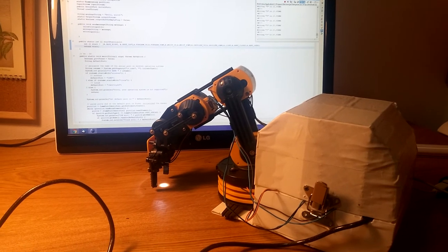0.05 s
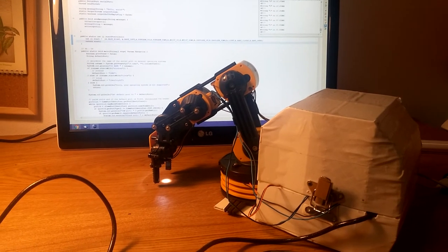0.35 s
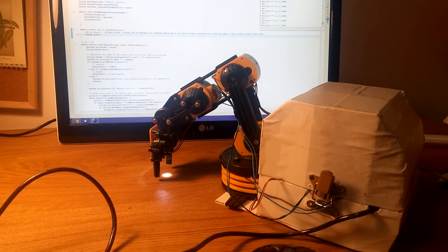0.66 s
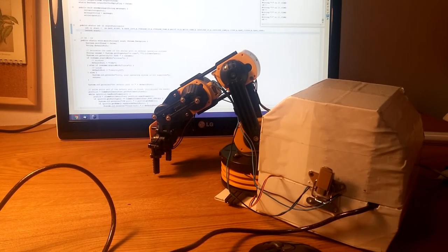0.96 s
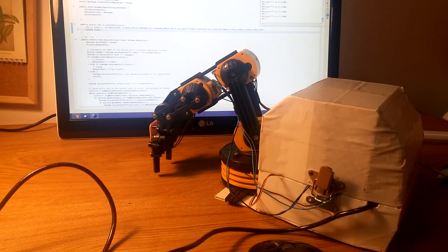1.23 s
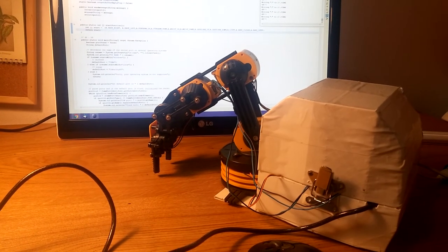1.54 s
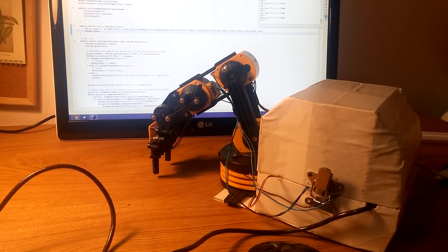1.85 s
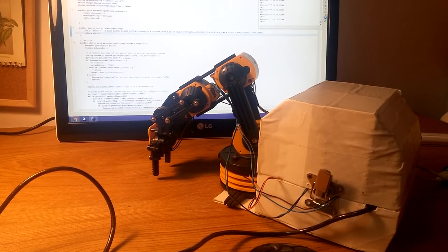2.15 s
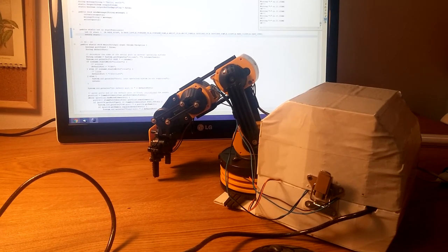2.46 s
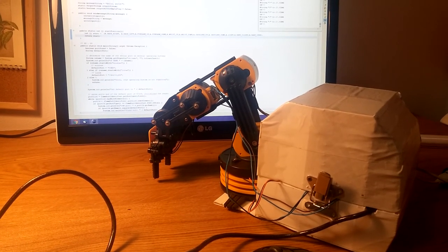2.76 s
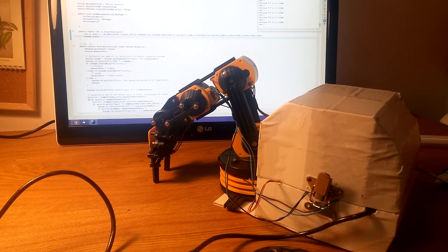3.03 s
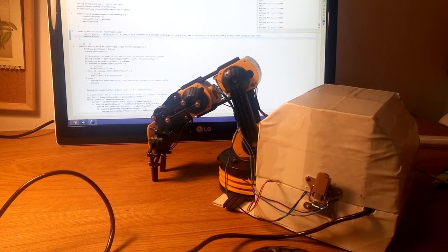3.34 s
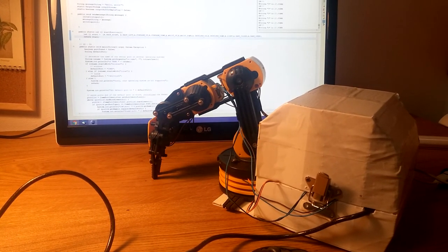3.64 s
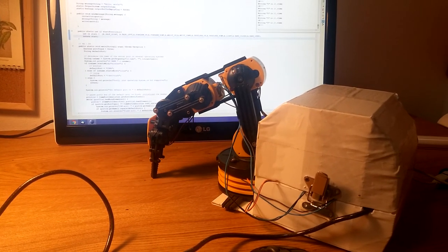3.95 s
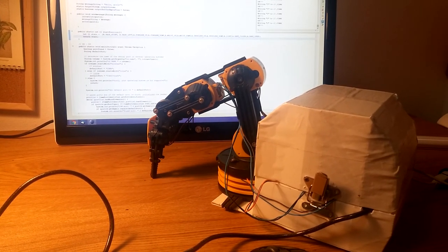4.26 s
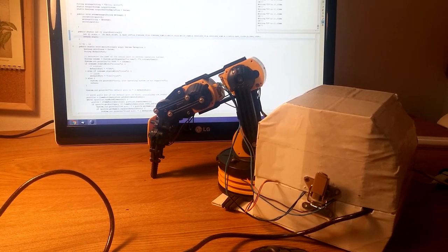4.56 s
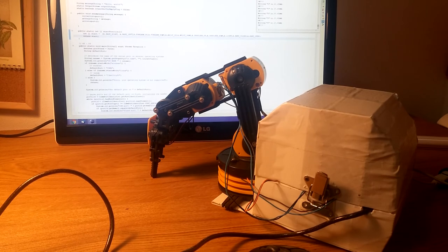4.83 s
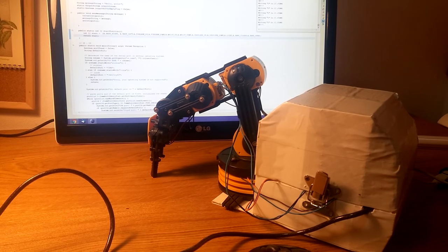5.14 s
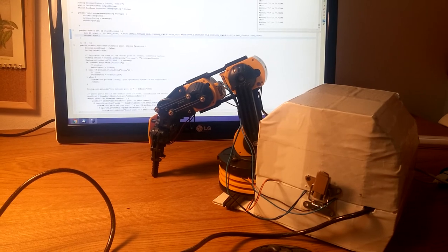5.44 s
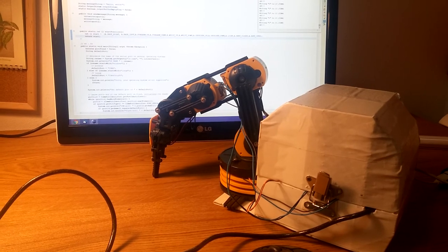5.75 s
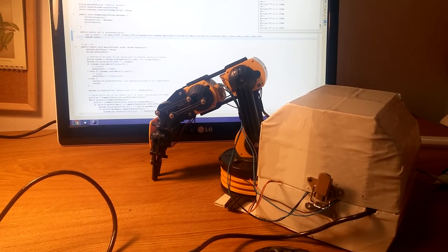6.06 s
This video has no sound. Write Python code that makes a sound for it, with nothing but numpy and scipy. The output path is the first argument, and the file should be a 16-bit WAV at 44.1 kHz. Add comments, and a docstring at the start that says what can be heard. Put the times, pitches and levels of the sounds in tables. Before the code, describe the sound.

For almost three seconds there is only quiet room noise with a faint, thin electronic whine. At about 2.9 seconds a small toy robot arm starts nearby with a brief high squeak, and its motor quickly spins up to a steady hum with a bright gear whir. A couple of light clicks come just after 3 seconds. From about 3.2 seconds the hum weakens as the plastic gears whine, chatter and judder under load. Around 4 seconds the joint hits its limit with a short bright rasp, a few knocks and a low thud, and the gears coast to rest by about 4.5 seconds. The quiet room returns. At about 5.9 seconds the motor starts again with small clicks, humming and whirring briefly until the end.

```python
"""A toy robot arm whirs on a desk, driven by a small brush motor through a plastic gearbox.
The shaft squeaks as it breaks free, the spinning rotor hums, and the gear teeth whine and chatter.
At the end of its travel the joint rasps and stops with a knock, and the gears coast to rest.
Then the motor starts again. Quiet room noise and a faint electronic whine lie underneath."""
import sys
import numpy as np
from scipy import signal
from scipy.fft import rfft, irfft
from scipy.io import wavfile
from scipy.ndimage import uniform_filter1d

SR = 44100
rng = np.random.default_rng(int(sys.argv[2]) if len(sys.argv) > 2 else 0)


def wav_out(sig):
    """Save sig, one row per channel (or a flat mono array), as 16-bit PCM at SR to the path in sys.argv[1]."""
    wavfile.write(sys.argv[1], SR, np.round(np.clip(np.atleast_2d(sig).T, -1, 1) * 32767).astype(np.int16))


N = 273420
TIME, FREQS = np.arange(N) / SR, np.maximum(np.arange(N // 2 + 1) * SR / N, 1)


def from_db(db):
    """Turn decibels into a gain."""
    return 10 ** (np.asarray(db) / 20)


def at_hz(points, hz):
    """Read between the rows of a table, on a log-frequency axis."""
    frequencies, values = np.transpose(points)
    return np.interp(np.log(hz), np.log(frequencies), values)


def envelope(start, length, attack_s, t60):
    """Rise, hold until the length is over, then fade by 60 dB every t60 seconds."""
    age = TIME - start
    return np.clip(age / attack_s, 0, 1) * from_db(-60 * np.clip((age - length) / t60, 0, 4))


def drift(rate):
    """A smooth random wobble, about 1 in size, that changes about rate times a second."""
    step = 40  # samples between points
    pole = np.exp(-2 * np.pi * rate * step / SR)
    slow = signal.lfilter([1], [1, -2 * pole, pole ** 2], rng.standard_normal(N // step + 2002))[2000:]
    return np.interp(np.arange(N) / step, np.arange(len(slow)), slow / np.sqrt(np.mean(slow ** 2)))


def resonances(modes, hz=FREQS):
    """Gain at each frequency for a part that rings at certain pitches."""
    return sum(from_db(db) / (1 + ((hz - centre) / width) ** 2) for centre, width, db in modes)


def radiation(hz=FREQS, corner_hz=82):
    """The small arm hardly moves any air in the deep bass."""
    return 1 / np.sqrt(1 + (corner_hz / hz) ** 10)


def impacts(cycles, spread_db, ring_s, bed):
    """Loudness shape of one hit per cycle, each of random force, over a bed of steady friction."""
    force = from_db(spread_db * np.clip(rng.standard_normal(N), -2, 2))
    hits = np.diff(np.floor(cycles), prepend=0) * force ** 2
    energy = signal.lfilter([1], [1, -np.exp(-2 / (ring_s * SR))], hits + 1e-18)
    average = uniform_filter1d(energy, size=4410) + 1e-9
    return np.sqrt((energy / average + bed) / (1 + bed))


# How the arm's sound leans to one side. Each row: frequency in Hz, left minus right in dB.
ARM_BALANCE = [(300, 0), (900, 0), (1400, -5), (2800, 1), (4000, -6.5), (4900, -0.5), (6000, -6.5),
               (8000, -11), (9500, -18.5), (11000, -27.5), (13000, -9), (15000, -10.5)]


def microphones(hz):
    """Left and right gain for the arm; the left microphone is shaded from its treble."""
    left = from_db(at_hz(ARM_BALANCE, hz))
    return np.array([left, np.ones_like(left)]) / np.sqrt((1 + left ** 2) / 2)


# How alike the arm sounds left and right. Each row: frequency in Hz, likeness (1 same, -1 opposite).
ARM_LIKENESS = [(130, 1), (290, 0.96), (640, 0.75), (1410, 0.24), (3100, -0.091), (7000, -0.18),
                (15000, -0.88)]


def noise(gain, likeness=ARM_LIKENESS, hz=FREQS, from_arm=True):
    """Stereo noise shaped by a gain at each frequency; the average of its two sides has power 1."""
    alike = np.clip(at_hz(likeness, hz), -.999, .999)
    mid, side = rfft(rng.standard_normal((2, 2 * len(hz) - 2)))
    pair = np.sqrt(1 + alike) * mid + np.sqrt(1 - alike) * side * [[1], [-1]]
    out = irfft(pair * gain * (microphones(hz) if from_arm else 1))
    return out / np.std(out.mean(axis=0))


# The tone of the room noise. Each row: frequency in Hz, relative level in dB.
ROOM_SPECTRUM = [(15, -8), (38, -22), (65, -12), (88, -1), (120, -8), (200, -3), (250, -2.5), (330, -4.5),
                 (1000, -7), (2000, -9), (5000, -14), (8500, -22), (13000, -29), (15500, -27.5)]
# How alike the room noise is left and right. Each row: frequency in Hz, likeness (1 same, 0 unrelated).
ROOM_LIKENESS = [(60, 0.76), (180, 0.22), (550, 0.091), (1650, 0.057), (4970, 0.02), (15000, 0.03)]
# Steady tones of the electronics. Each row: pitch in Hz, level in dB, pitch wander in Hz.
ELECTRONIC_TONES = [(51.7, -83, .15), (88.4, -84, 0.52), (93, -88, .3), (254, -87.5, 0.68),
                    (2386, -81, 5.9), (4775, -93.5, 7.4), (8100, -98, 1)]


def background():
    """Even room noise with the hum and thin whine of the desk electronics."""
    out = from_db(-69) * noise(from_db(at_hz(ROOM_SPECTRUM, FREQS)), ROOM_LIKENESS, from_arm=False)
    for hz, db, wander_hz in ELECTRONIC_TONES:
        cycles = np.cumsum(hz + wander_hz * drift(15)) / SR
        out += from_db(db) * np.sqrt(2) * np.sin(2 * np.pi * cycles)
    return out


def room_echo(sound, t60, wet_db, size=16384):
    """Desk and walls add a short wash of echoes, different at each microphone."""
    age = np.arange(size) / SR
    tail = rng.standard_normal((2, size)) * from_db(-60 * age / t60) * (age > .004)
    band = signal.butter(2, [450, 7000], "band", fs=SR, output="sos")
    tail = signal.sosfilt(band, tail / np.sqrt(np.sum(tail[0] ** 2)))
    return sound + from_db(wet_db) * signal.fftconvolve(sound, tail, axes=1)[:, :N]


# The tones in the squeak. Each row: pitch in Hz, pitch wander in Hz, relative level in dB.
SQUEAK_TONES = [(3780, 82, 1.5), (3990, 129, 0.5), (7460, 132, -1), (11020, 190, 2)]


def shaft_squeak(start=2.8598):
    """The shaft sticks and slips as it breaks free: rough tones, of which the upper ones die first."""
    age, out = np.clip(TIME - start, 0, .1), 0
    for hz, wander_hz, db in SQUEAK_TONES:
        cycles = np.cumsum(hz + wander_hz * drift(300)) / SR + rng.random((2, 1)) / 4
        tone = microphones(hz)[:, None] * np.sin(2 * np.pi * cycles)
        hiss = 0.5 * noise(resonances([(hz, 220, 0)]))
        fade_db = -85 * age * (hz / SQUEAK_TONES[0][0] - 1)
        out += from_db(db + fade_db + 2 * drift(150)) * (tone + hiss)
    level_db = -50 + 11.5 * np.exp(-age / .01)  # loudest as it breaks free
    return from_db(level_db) * envelope(start, length=.036, attack_s=.002, t60=.19) * out


STRAIN_AT_S, STRAIN_S, STRAIN_ATTACK_S = 3.935, 0.11, .026  # the joint pushes against its end stop
# The tone of the scraping teeth. Each row: frequency in Hz, relative level in dB.
RASP_SPECTRUM = [(1700, -37), (2500, -9.5), (3100, -7), (4000, -4), (5800, -2), (7400, -5.5), (8100, -13),
                 (9400, -4), (10700, -3), (12000, -15), (13500, -21), (15700, -21)]


def end_stop_rasp():
    """Strained teeth scrape over each other, about 880 a second, in a short bright rasp."""
    teeth = np.cumsum(880 * from_db(1.5 * drift(40))) / SR
    scrape = noise(from_db(at_hz(RASP_SPECTRUM, FREQS)))
    scrape *= impacts(teeth, spread_db=3, ring_s=.0015, bed=.6)
    return from_db(-31.5) * envelope(STRAIN_AT_S, STRAIN_S, STRAIN_ATTACK_S, t60=0.32) * scrape


def frame_thud(start=4.062, db=-26.5, hz=128, attack_s=0.0115, t60=.3):
    """The halting arm shakes the frame, whose main note builds up over a few cycles and dies."""
    age = np.maximum(TIME - start, 0)
    return from_db(db - 60 * age / t60) * (1 - np.exp(-age / attack_s)) * np.sin(2 * np.pi * hz * age)


# Plastic parts knock as they take up their slack. Each row: start in seconds, relative level in dB,
# centre in Hz, width in octaves, seconds to fade by 60 dB.
KNOCKS = [(0.417, -66, 10000, .3, 0.014), (2.863, -52.5, 228, 0.38, 0.59), (3.086, -39, 1400, 0.35, 0.044),
          (3.171, -34, 6530, 1.2, 0.04), (3.171, -34, 11040, 0.023, 0.12), (3.815, -34.5, 304, 0.3, 0.17),
          (3.925, -37.5, 280, 0.35, 0.16), (4.053, -30, 10500, .4, 0.15), (4.058, -34, 600, 2.5, 0.18),
          (4.069, -40, 1090, 1.4, 0.1364), (4.088, -36.5, 300, 0.92, 0.16), (4.19, -57, 1890, 0.084, 0.55),
          (5.859, -55, 9300, 0.27, .04), (5.887, -45.5, 3500, 2.4, 0.042), (5.931, -47, 440, 0.079, 0.68),
          (6.002, -40.5, 2150, 0.13, 0.033)]


def knocks(size=16384):
    """Each knock rings one band of the frame, the gearbox shell and the gears."""
    out, age = np.zeros((2, N + size)), np.arange(size) / SR
    hz = np.maximum(np.arange(size // 2 + 1) * SR / size, 1)
    frame = from_db(9.5) * resonances(FRAME_MODES, hz)
    body = radiation(hz) * (frame + resonances(SHELL_MODES, hz) + from_db(at_hz(WHIRR_SPECTRUM, hz)))
    for start, db, centre_hz, octaves, t60 in KNOCKS:
        band = np.exp(-.5 * (np.log2(hz / centre_hz) / octaves) ** 2)
        rise = 1 - np.exp(-2 * age * centre_hz)
        at = round(start * SR)
        out[:, at:at + size] += from_db(db - 60 * age / t60) * rise * noise(body * band, hz=hz)
    # soft plastic contacts leave out the highest treble
    return signal.sosfilt(signal.butter(10, 11600, fs=SR, output="sos"), out[:, :N] + 1e-18)


# Low ringing of arm and desk. Each row: pitch in Hz, width in Hz, relative level in dB.
FRAME_MODES = [(82.3, 7, -4.5), (98.7, 12, -7), (128.3, 4.9, 10.5), (181, 30, -20.5), (256.6, 26, 0)]
# The arm judders. Each row: start in seconds, length in seconds, relative level in dB.
JUDDERS = [(2.873, 0.055, -58), (3.35, 0.064, -50.5), (3.445, 0.15, -48), (3.64, .11, -48),
           (3.82, 0.12, -48.5), (4.045, 0.13, -47), (5.875, 0.12, -53.5), (6.04, .05, -54),
           (6.14, 0.023, -47)]


def frame_rumble(level_db):
    """The gears shake the frame, and the arm judders as it starts and under load."""
    judder = sum(from_db(db) * envelope(start, length, attack_s=.015, t60=0.1505)
                 for start, length, db in JUDDERS)
    return np.hypot(from_db(level_db), judder) * from_db(-1.5) * noise(resonances(FRAME_MODES) * radiation())


def rotor_hum(turns, speed, load):
    """The unbalanced rotor shakes the arm once a turn, most at the pitches where the arm rings."""
    widen = 1 + 5 * load ** 2  # the arm's weight damps and widens its resonances
    modes = [(257.3, 8.1 * widen, 2.2), (291.2, 2.3 * widen, 0.87)]  # pitch in Hz, width in Hz, dB
    shake = resonances(modes, speed) + from_db(-33.5)  # a little gets through at any speed
    keep = np.exp(-1 / (0.023 * SR))  # the ringing takes 23 ms to build up
    shake = signal.lfilter([1 - keep], [1, -keep], shake)
    loose = 0.32 * load ** 3  # loose joints blur this share of the tone into noise
    blur = noise(resonances([(283.4, 48.5, 0)]))
    return shake * (np.sqrt(1 - loose) * np.sin(2 * np.pi * turns) + np.sqrt(loose) * blur)


# Jolts that throw the gear teeth about. Each row: start in seconds, length in seconds.
JOLTS = [(2.862, 0.078), (3.086, 0.11), (5.856, 0.15)]


def rattle_share(load):
    """How much the teeth rattle, from 0 to 1: a little always, more under load and after a jolt."""
    jolted = sum(envelope(start, length, attack_s=0.0039, t60=0.19) for start, length in JOLTS)
    return np.clip(0.044 + load ** 3 + jolted, 0, 1)


# Ringing of the gearbox shell. Each row: pitch in Hz, width in Hz, relative level in dB.
SHELL_MODES = [(330, 61, -7), (437, 49, 6), (620, 80, -1), (778, 40, -2.5), (830, 67, -0.5), (941, 11, 8),
               (1058, 28, 8), (1217, 54, 1.5), (1482, 76, -4), (1700, 250, 1.5), (1910, 49, 2.5),
               (2140, 70, -3.5), (2330, 45, -2), (2634, 70, -4)]


def gear_chatter(turns, rattle):
    """Rattling teeth ring the shell with one uneven hit every two turns of the rotor."""
    shell = noise(resonances(SHELL_MODES))
    return np.sqrt(rattle) * shell * impacts(turns / 2, spread_db=7.5, ring_s=0.022, bed=1)


# The tone of the whirring gears. Each row: frequency in Hz, relative level in dB.
WHIRR_SPECTRUM = [(1400, -34.5), (2500, -2.5), (3400, -9), (4000, -5), (5200, 2), (6300, -4.5), (7300, -6),
                  (8100, -13), (9400, -1), (10700, 0), (12000, -8), (13000, -21.5), (15500, -21)]
# Ringing of the gear wheels. Each row: pitch in Hz, width in Hz, relative level in dB.
WHEEL_MODES = [(3176, 77, -6), (3960, 104, 1.5), (4750, 119.5, -5.5)]


def gear_whirr(turns):
    """Three light tooth hits per turn blend into a bright whirr that rings the wheels."""
    wheels = noise(from_db(at_hz(WHIRR_SPECTRUM, FREQS)) + resonances(WHEEL_MODES))
    return wheels * impacts(3 * turns, spread_db=1, ring_s=0.0018, bed=0.52)


# The rotor's overtones. Each row: multiple of the speed (rounded when played), relative level in dB
# with no load, relative level in dB at full load.
OVERTONES = [(2, -21, -19), (3, -17, -9.5), (4, -25, -26.5), (5, -17.5, -14.5), (6, -11, -20),
             (7, -11, -19.5), (8, -16, -20.5), (9.33, -23, -25), (10, -24.5, -21.5), (11, -19, -30.5),
             (12, -18, -26), (13, -22, -21), (14, -27, -17.5), (15, -24.5, -16.5), (17, -20, -15),
             (18, -24, -16), (18.95, -18.5, -19.5), (20, -16, -23), (21, -27, -16), (22, -34, -16.5),
             (23, -20, -19), (24, -25.5, -24.5), (25, -28, -16), (26, -36, -22.5), (30, -13, -21.5),
             (31, -32, -23.5), (32, -24, -16), (32.9, -8.5, -21.5), (34, -14, -24), (35, -25, -16),
             (36, -7, -14), (37, -33, -35), (38, -17, -29.5), (39, -5, -40), (40, -28, -45), (41, -23, -37)]
# The gears sing out on one overtone. Each row: start in seconds, length in seconds,
# multiple of the speed, boost in dB.
WHISTLES = [(3.08, 0.1, 20, 8.5), (3.3, .19, 19, 13), (3.349, 0.22, 14, 9), (3.456, 0.12, 20, 15.5),
            (3.56, 0.072, 19, 13), (3.647, 0.27, 18, 4.5), (3.83, .08, 17, 9), (6.044, 0.065, 14, 18),
            (6.066, 0.081, 19, 10), (6.1, .1, 18, 7), (6.092, 0.14, 17, 4.5)]


def rotor_whine(turns, speed, load, low_db, high_db):
    """The motor's brush contacts and small gear make overtones that swell and fade as the teeth shift."""
    started = TIME > RUNS[0][0]
    jitter = .0022 * (1 + load) * drift(25)
    out, phase = np.zeros((2, N)), 2 * np.pi * (turns + jitter)[started]
    top_speed = speed.max()
    too_slow_db = -np.maximum(.98 * top_speed - speed, 0) / 3  # high overtones need full speed
    # strained or coasting gears lose their even mesh until the next start
    mesh_db = np.clip(-120 * (TIME - STRAIN_AT_S), -30, 0) * (TIME < RUNS[1][0])
    for multiple, light_db, loaded_db in OVERTONES:
        hz = multiple * top_speed
        base_db = low_db if hz < SHELL_MODES[-1][0] else high_db + too_slow_db
        whistle_db = sum(db * envelope(start, length, attack_s=.03, t60=0.19)
                         for start, length, singing, db in WHISTLES if round(singing) == round(multiple))
        overtone_db = light_db + load * (loaded_db - light_db)
        swell = from_db(base_db + overtone_db + whistle_db + mesh_db + 3 * drift(13))[started]
        right_shift = np.arccos(np.clip(at_hz(ARM_LIKENESS, hz), -1, 1)) * rng.choice([-1, 1])
        offsets = rng.uniform(0, 2 * np.pi) + np.array([[0], [right_shift]])
        out[:, started] += microphones(hz)[:, None] * swell * np.sin(round(multiple) * phase + offsets)
    return out


# Full speed sags and recovers with the arm's leverage. Each row: time in seconds, turns per second.
FULL_SPEED = [(3.1, 291.6), (3.184, 291.0), (3.262, 297.0), (3.378, 288.0), (3.6, 288.2), (3.87, 294.7)]
# The motor's runs. Each row: power on, power off and start of lifting in seconds, load before lifting
# from 0 to 1, relative level in dB, extra hum in dB.
RUNS = [(2.862, 4.049, 3.195, 0.19, 0, 0.5), (5.856, 6.3, 6.06, 0.21, -0.5, -3)]


def motor_motion(kick_hz=128, spin_up_s=.255, brake_hz_per_s=713):
    """The rotor spins up from a kick and takes the arm's weight; with the power off, friction brakes it."""
    full_speed = np.interp(TIME, *np.transpose(FULL_SPEED))
    state = np.zeros((5, N))
    for on, off, lift, idle_load, db, extra_hum_db in RUNS:
        coast_s = np.maximum(TIME - off, 0)
        lag = np.clip(1 - (TIME - on) / spin_up_s, 0, 1) ** 2
        speed = np.maximum(full_speed + (kick_hz - full_speed) * lag - brake_hz_per_s * coast_s, 0)
        lifted = np.clip((TIME - lift) / 0.097, 0, 1)
        working_load = 0.81 + 0.32 * (TIME - lift)  # grows as the arm reaches out
        load = np.clip(idle_load + lifted * (working_load - idle_load), 0, 1)
        gain = from_db(db) * np.clip((TIME - on) / 0.026, 0, 1) * np.minimum(speed / 45, 1)
        state = np.where(TIME >= on, [speed, load, coast_s, gain, np.full(N, extra_hum_db)], state)
    return state


def motor_and_gearbox():
    """Hum, whine, chatter, whirr and rumble all follow the motor's speed and load."""
    speed, load, coast_s, gain, extra_hum_db = motor_motion()
    turns, rattle = np.cumsum(speed) / SR, rattle_share(load)
    decades = np.log10(np.maximum(speed, 1) / speed.max())  # -1 at a tenth of top speed

    def level(db, speed_db, load_db, fade_db):
        """Level at top speed, changed per tenfold speed, by full load and per second of coasting."""
        return db + speed_db * decades + load_db * load - fade_db * coast_s

    hum_db = level(-27.5, speed_db=1.5, load_db=-29, fade_db=7) + extra_hum_db
    chatter_db = level(-49.44, speed_db=30, load_db=4.5, fade_db=39)
    whirr_db = level(-47, speed_db=20.5, load_db=5, fade_db=47)
    # tight teeth give clean overtones, rattling ones give noise
    low_whine_db = level(-39.5, speed_db=30, load_db=4.5, fade_db=39) - 4.5 * rattle
    high_whine_db = level(-37, speed_db=20.5, load_db=4, fade_db=47)
    hum = from_db(hum_db) * rotor_hum(turns, speed, load)
    whine = rotor_whine(turns, speed, load, low_whine_db, high_whine_db)
    chatter = from_db(chatter_db) * gear_chatter(turns, rattle)
    whirr = from_db(whirr_db) * gear_whirr(turns)
    rumble = frame_rumble(level(-62, speed_db=10, load_db=9, fade_db=26.5))
    # the gearbox goes quieter while it is jammed at the end stop
    jam = from_db(-5 * envelope(STRAIN_AT_S, STRAIN_S, STRAIN_ATTACK_S, t60=0.044))
    return gain * jam * (hum + whine + chatter + whirr + rumble)


def scene():
    """The arm in its room; the arm's sound has no deep bass below about 58 Hz."""
    arm = motor_and_gearbox() + end_stop_rasp() + shaft_squeak() + knocks() + frame_thud()
    arm = signal.sosfilt(signal.butter(4, 58, "high", fs=SR, output="sos"), arm + 1e-18)
    return room_echo(arm, t60=.25, wet_db=-11) + background()


def record(dry):
    """The treble above 15800 Hz is cut steeply."""
    return irfft(rfft(dry) / np.sqrt(1 + (FREQS / 15800) ** 300))


dry = scene()
out = record(dry)
wav_out(out)
```